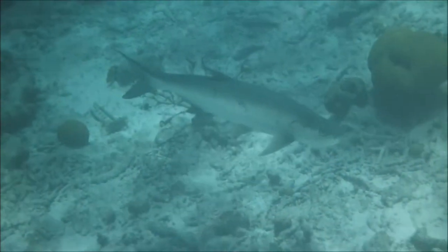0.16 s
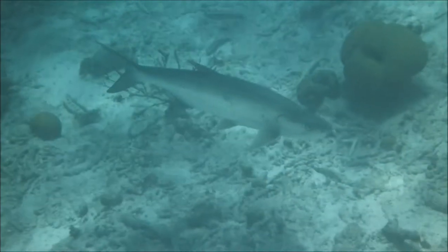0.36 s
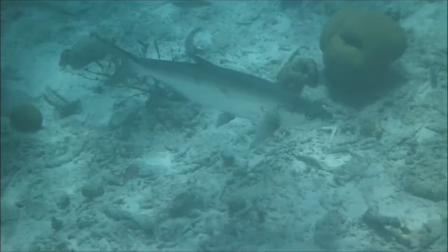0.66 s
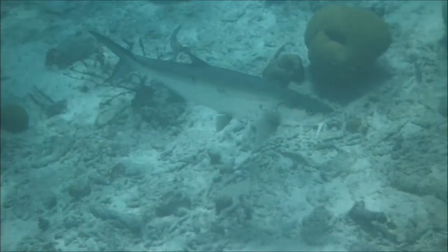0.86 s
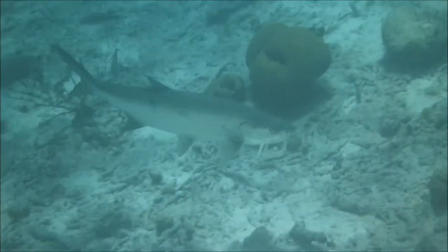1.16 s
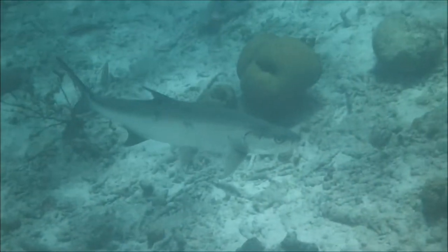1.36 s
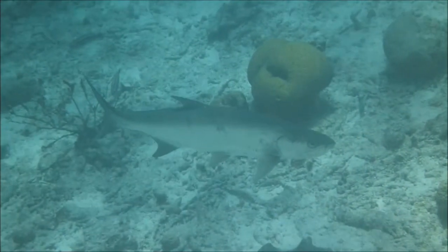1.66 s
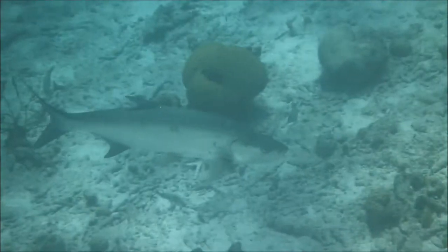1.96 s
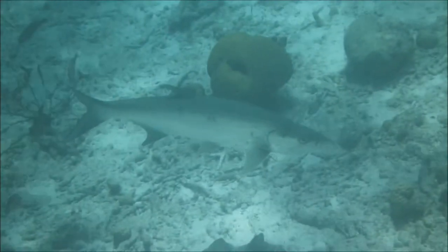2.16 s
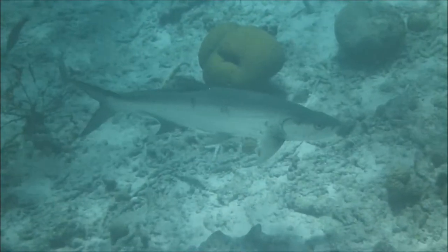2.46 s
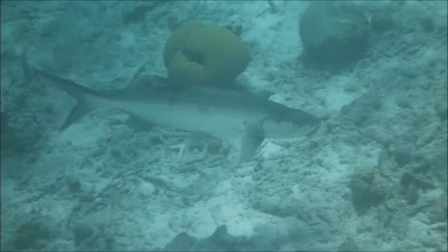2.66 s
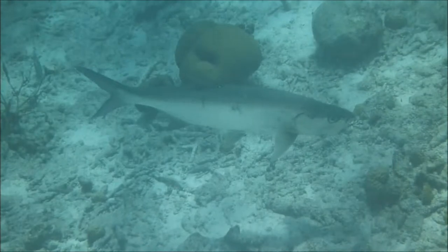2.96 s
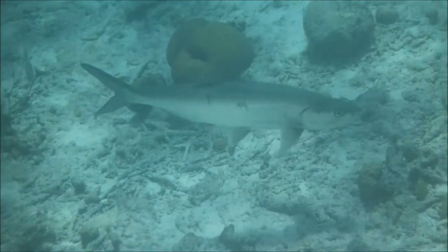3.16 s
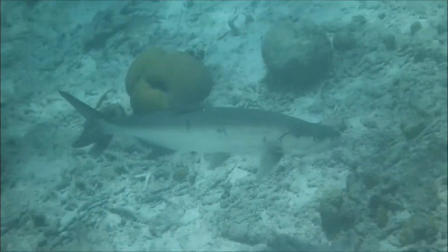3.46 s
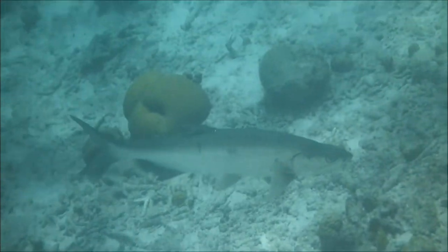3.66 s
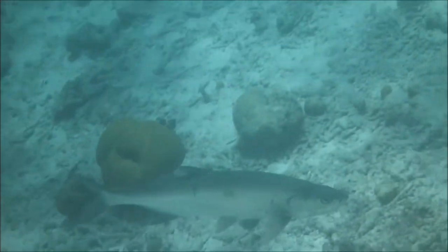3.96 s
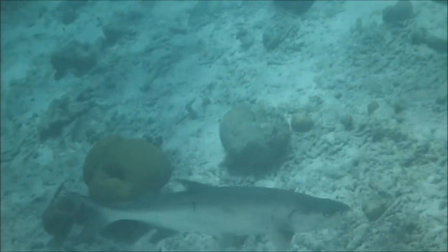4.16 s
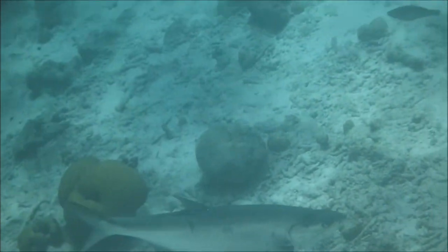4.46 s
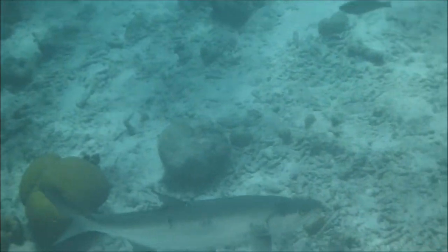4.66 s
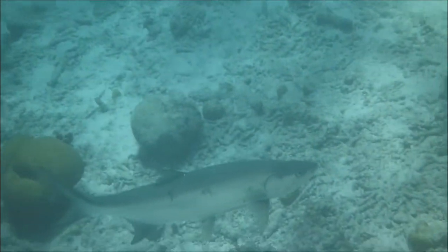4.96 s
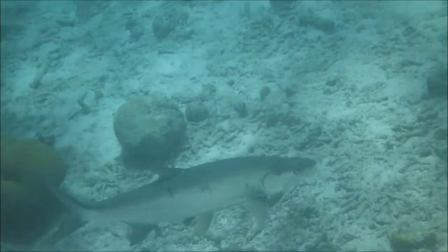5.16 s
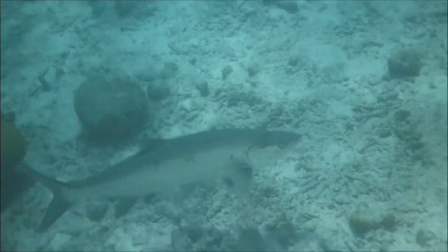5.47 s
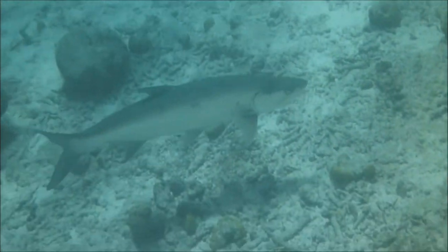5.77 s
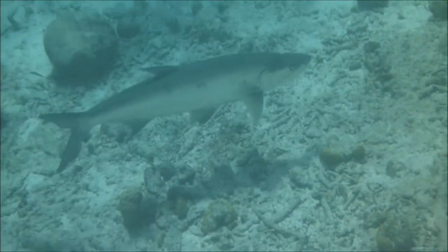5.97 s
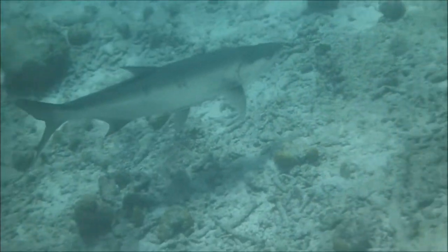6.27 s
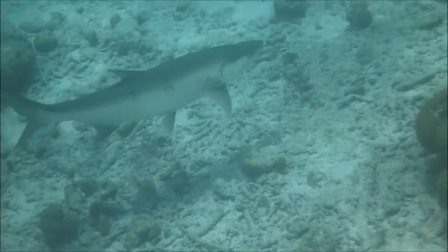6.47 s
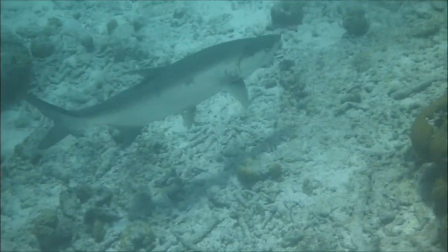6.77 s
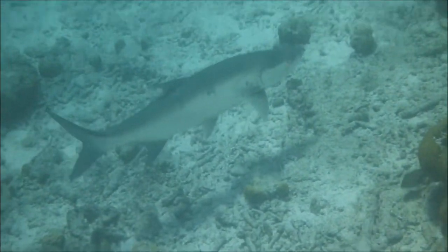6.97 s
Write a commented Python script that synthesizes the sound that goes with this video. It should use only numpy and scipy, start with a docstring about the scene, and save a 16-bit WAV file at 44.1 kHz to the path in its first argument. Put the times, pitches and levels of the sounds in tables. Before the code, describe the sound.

Snapping shrimp crackle densely over a flickering underwater hiss, with a faint motor ticking early, dull water thuds and small bubble pops.

```python
"""Snapping shrimp crackle near and far on a coral reef, heard under water from inside a sealed camera housing.
Snaps are clicks with ragged bodies, coral tails and echoes; the most distant merge into flickering noise. A
focus motor's steps ring the lens barrel in bursts, one longer run and three knocks, all in the first 3 s. Water
nudges the case with dull thuds, bubbles and small knocks pop as ringing sines, a hollow resonance wavers
beneath. The recorder cuts bass and top, notches three pitches, ducks after loud snaps and limits."""
import sys
import numpy as np
from scipy import signal
from scipy.fft import rfft, irfft
from scipy.io import wavfile
from scipy.ndimage import uniform_filter1d, minimum_filter1d

SR = 44100
rng = np.random.default_rng(int(sys.argv[2]) if len(sys.argv) > 2 else 0)


def unload_audio(sound):
    """Save the sound as a 16-bit wav file, at the path given as the first command line argument."""
    columns = np.transpose(np.atleast_2d(sound))
    # keep every value between -1 and 1, then stretch to whole-number steps
    steps = np.round(np.clip(columns, -1, 1) * 32767)
    wavfile.write(sys.argv[1], SR, steps.astype(np.int16))


N = 313551

# frequency bands in which snaps are built: low_hz, high_hz
BANDS_HZ = [(1100, 2900), (2900, 5000), (5000, 8500), (8500, 15800)]


def from_db(db):
    """Decibels to amplitude ratio."""
    return 10 ** (np.asarray(db) / 20)


def rms_one(x):
    """Scale to an RMS of 1."""
    return x / np.sqrt(np.mean(x ** 2) + 1e-20)


def in_time(rows):
    """Interpolate each column after the first (time in s) to every sample."""
    s, *columns = np.transpose(rows)
    return [np.interp(np.arange(N) / SR, s, c) for c in columns]


def drift(rate_hz):
    """Slow chance of spread 1: noise through two equal one-pole low-passes, run in."""
    step = 40   # samples between drawn values
    r = np.exp(-2 * np.pi * rate_hz * step / SR)
    noise = rng.standard_normal(N // step + 2002)
    slow = signal.lfilter([1], [1, -2 * r, r * r], noise)[2000:]
    return np.interp(np.arange(N) / step, np.arange(len(slow)), rms_one(slow))


def clicks(times_s, sizes):
    """Single-sample impulses at the given times."""
    out = np.zeros(N)
    at = np.clip((np.asarray(times_s) * SR).astype(int), 0, N - 1)
    np.add.at(out, at, sizes)
    return out


def dying(x, t60_s):
    """Every click becomes a jump that decays exponentially."""
    return signal.lfilter([1], [1, -from_db(-60 / (t60_s * SR))], x + 1e-18)


def ring(x, hz, t60_s):
    """Two-pole resonator: a unit click starts a decaying sine of height about 1."""
    r = from_db(-60 / (t60_s * SR))
    w = 2 * np.pi * hz / SR
    return signal.lfilter([0, np.sin(w)], [1, -2 * r * np.cos(w), r * r], x + 1e-18)


def shrimp(hiss_db):
    """Each snap is a click with a ragged body a few ms long; coral scatters it into a short noise tail."""
    # distant snaps, by band: tilt_db
    far_tilt_db = [-9, -4, 0, -14]
    # ragged body of a snap, by band: t60_s
    crack_t60_s = [0.0029, 0.0058, 0.007, 0.0071]
    grit_db = -14   # body re click
    scatter_db, scatter_t60_s = [-30, -25, -34, -52], 0.029   # coral tail re click, by band
    far_per_s, far_colour_db = 400, 9
    far_floor_db, far_spread_db, far_max_spreads = -1, 6, 4   # floor re hiss, before tilt and colour

    near_s, near_db = near_snaps()
    spreads = np.minimum(rng.exponential(1, N), far_max_spreads)
    far_db = hiss_db + far_floor_db + far_spread_db * spreads
    born = rng.random(N) < far_per_s * from_db(3 * drift(8)) / SR
    grit = rng.choice([-1, 1], N)
    wash = rng.standard_normal(N)
    out = 0
    for k, shape in enumerate(case_bands()):
        # the path of a far snap takes away some bands and spares others
        path_db = -far_colour_db * np.abs(rng.standard_normal(N))
        far = born * from_db(far_db + far_tilt_db[k] + path_db)
        snaps = far + clicks(near_s, from_db(near_db[:, k]))
        body = from_db(grit_db) * dying(snaps, crack_t60_s[k]) * grit
        tail = from_db(scatter_db[k]) * dying(snaps, scatter_t60_s) * wash
        out = out + signal.fftconvolve(snaps + body + tail, shape)[:N]
    return out


def near_snaps():
    """Times and band levels of near snaps, each with three echoes between sea bed and coral."""
    # near snaps: start_s, level_db, strongest_pitch_hz, fall_db_per_octave away from that pitch; the row at
    # 2.766 s is the focus motor's first knock, built like a snap
    snap_rows = [(0.0484, -10.5, 5100, 14), (0.0527, -18, 3610, 4), (0.1118, -19.0, 5800, 18),
                 (0.431, -14, 8900, 17), (0.4418, -24.5, 9000, 2), (0.51, -19.5, 5200, 11),
                 (0.684, -12.5, 6100, 9.5), (0.8434, -15.5, 3270, 18), (0.8505, -13.5, 7500, 6.5),
                 (0.969, -19, 8680, 15), (0.9913, -17.5, 6240, 6), (1.0129, -19, 5010, 16),
                 (1.0633, -16, 3150, 20), (1.0733, -16, 3100, 18), (1.102, -20.0, 4330, 19),
                 (1.2164, -15.5, 9000, 20), (1.2563, -15, 8900, 18), (1.4399, -15, 6300, 11.5),
                 (1.5103, -20, 2720, 14), (1.5358, -16, 8680, 22), (1.6447, -11, 5100, 9.5),
                 (1.7914, -15.5, 9100, 11.5), (1.8192, -8.5, 9400, 18), (1.8708, -20.0, 4970, 17),
                 (2.0186, -12.5, 8060, 8.5), (2.0265, -26.5, 5200, 5), (2.1636, -23.0, 5800, 18),
                 (2.1774, -12.0, 8600, 7.5), (2.2605, -18.5, 2880, 1.5), (2.2646, -14, 4870, 11),
                 (2.431, -14.5, 4700, 23), (2.5096, -24.5, 7800, 4), (2.766, -10.5, 3000, 20),
                 (2.8043, -17, 5800, 20), (2.8655, -13.5, 5640, 8), (2.9792, -12.0, 2650, 10.5),
                 (3.0944, -17.5, 4490, 11), (3.1106, -12.5, 7780, 18), (3.1436, -15, 9000, 15),
                 (3.156, -19.0, 9000, 5), (3.2753, -24, 6480, 21), (3.425, -10, 9400, 19),
                 (3.5383, -16, 7230, 15), (3.5805, -23, 8600, 9), (3.691, -22.0, 5230, 10),
                 (3.7012, -9.5, 5590, 5), (3.7489, -14, 3350, 17), (3.7707, -8, 4600, 3.5),
                 (3.8616, -23.0, 8700, 11), (3.958, -19, 7500, 13), (4.0034, -25, 4200, 10),
                 (4.0092, -13.5, 9000, 17), (4.0233, -27, 2240, 3), (4.0285, -11.5, 4760, 14),
                 (4.0475, -15, 4490, 18), (4.0776, -22, 8370, 8.5), (4.209, -20, 4470, 14),
                 (4.2451, -7, 6800, 14.5), (4.2788, -18.5, 7500, 18), (4.3792, -26, 3800, 8),
                 (4.4765, -4.5, 1550, 6), (4.5969, 1, 2030, 6), (4.7828, -24, 7100, 13),
                 (4.8222, -13.5, 5300, 17), (4.8683, -20, 5170, 15), (4.9446, -24, 5500, 7),
                 (5.2924, -15.0, 7200, 21), (5.7331, -11, 2850, 23), (6.089, -19, 4700, 11),
                 (6.175, -14.5, 9100, 15.5), (6.2365, -15, 7700, 11.5), (6.438, -15.5, 5250, 11),
                 (6.5048, -8.5, 1970, 6.5), (6.5087, -3.5, 3080, 30), (6.5319, -4.5, 8500, 21),
                 (6.634, -14.5, 5800, 14), (6.7561, -10, 7600, 7), (6.7771, -21, 3880, 12),
                 (6.8013, -12, 8060, 17), (6.8077, -8, 7700, 11), (6.812, -20.5, 5010, 9),
                 (6.8656, -22, 7500, 12), (6.9216, -13, 7500, 12), (7.0837, -19, 4950, 18)]
    # a sharp blow rings the high band of the case and hardly reaches the top one, by band: lift_db
    case_lift_db = [-0.5, 0.5, 4, -2]
    echo_s, echo_spread_s, echo_db, echo_colour_db = 0.0057, 0.0006, -17, 5.5   # delay, level per echo

    s, level_db, hz, fall_db = np.transpose(snap_rows)
    centre_hz = np.sqrt(np.prod(BANDS_HZ, axis=1))
    octaves = np.abs(np.log2(centre_hz / hz[:, None]))
    direct_db = level_db[:, None] - fall_db[:, None] * octaves + case_lift_db
    times_s, levels_db = [s], [direct_db]
    for n in (1, 2, 3):
        jitter_s = echo_spread_s * rng.standard_normal(len(s))
        colour_db = echo_colour_db * rng.standard_normal(direct_db.shape)
        times_s.append(s + n * echo_s + jitter_s)
        levels_db.append(direct_db + n * echo_db + colour_db)
    return np.concatenate(times_s), np.concatenate(levels_db)


def case_bands():
    """Impulse response of the case within each band, peak 1."""
    case = housing_response()[:512]
    shapes = []
    for band_hz in BANDS_HZ:
        band = signal.butter(3, band_hz, "band", fs=SR, output="sos")
        shape = signal.sosfilt(band, case)
        shapes.append(shape / np.abs(shape).max())
    return shapes


def housing_response(size=8192):
    """Minimum-phase impulse response of case and microphone, by folding the cepstrum."""
    # colour of case and microphone: pitch_hz, level_db
    colour = [(130, -22.5), (400, -2.5), (900, -2), (2140, -1.5), (2460, 1), (3000, -6), (3850, -0.5),
              (4400, -5), (6570, 1), (8100, -7.5), (9500, -17.5), (10700, -13), (14300, -24),
              (15800, -20.5)]
    hz, db = np.transpose(colour)
    grid_hz = np.maximum(np.arange(size // 2 + 1) * SR / size, 10)
    cepstrum = irfft(np.log(from_db(np.interp(np.log(grid_hz), np.log(hz), db))))
    cepstrum[1:size // 2] *= 2
    cepstrum[size // 2 + 1:] = 0
    return irfft(np.exp(rfft(cepstrum)))[:size // 2]


def motor():
    """Steps at a steady rate strike the lens barrel's modes, in bursts, then one longer run; silent between."""
    # motor level, interpolated: time_s, level_db
    level_rows = [(0, -43.5), (2.1, -42.5), (2.25, -54), (2.55, -46)]
    # lens barrel modes: pitch_hz, level_db, t60_s (steps only)
    modes = [(954, -10, .05), (1300, -6, .015), (2860, -8, .05), (2980, -6, .035), (3100, 0, .05)]
    # the last two of the motor's three knocks as the lens settles (the first is built like a near snap):
    # start_s, level_db
    knock_rows = [(2.8148, -25), (2.8815, -31)]
    step_hz, burst_hz, step_jitter_s = 119.2, 14.985, 4e-5
    burst_start_s, burst_s = 0.038, 0.036
    run_start_s, run_end_s = 2.505, 2.72

    t = np.arange(N) / SR
    bursts = ((t - burst_start_s) % (1 / burst_hz) < burst_s) & (t < run_start_s)
    run = (t > run_start_s) & (t < run_end_s)
    moving = uniform_filter1d(1. * (bursts | run), size=120)

    starts_s = np.arange(burst_start_s, run_start_s - burst_s, 1 / burst_hz)
    burst_steps_s = (starts_s[:, None] + np.arange(0, burst_s, 1 / step_hz)).ravel()
    steps_s = np.append(burst_steps_s, np.arange(run_start_s, run_end_s, 1 / step_hz))
    steps_s += step_jitter_s * rng.standard_normal(len(steps_s))
    knock_s, knock_db = np.transpose(knock_rows)
    rings, knocks = 0, 0
    for k, (hz, db, t60_s) in enumerate(modes):
        chance_db = rng.normal(0, 2, len(steps_s))
        rings = rings + ring(clicks(steps_s, from_db(db + chance_db)), hz, t60_s)
        if k > 0:   # knocks leave out the lowest mode
            knocks = knocks + ring(clicks(knock_s, from_db(knock_db + db)), hz, 0.031)
    return from_db(in_time(level_rows)[0]) * moving * rings + knocks


def water():
    """Thuds are dull pushes plus low noise under soft swells; the noise also sloshes at random; bubbles and
    small knocks ring."""
    # clear knocks of water on the case: time_s (push starts thud_delay_s later), level_db
    thud_rows = [(0.616, -39.5), (1.313, -46), (1.436, -41), (1.493, -50), (1.575, -52), (1.669, -45),
                 (1.778, -53), (2.135, -46), (2.248, -48), (2.429, -45), (2.479, -44), (2.644, -49),
                 (3.099, -51), (3.212, -47), (4.127, -41), (4.381, -49), (4.527, -34), (4.846, -50),
                 (4.998, -44), (5.498, -39.5), (5.59, -46), (5.845, -39.5), (5.946, -46), (6.071, -49),
                 (6.206, -54), (6.916, -51)]
    # short pitched pops: small bubbles, and ringing knocks at 2.572, 3.224, 5.798 and 6.748 s: start_s,
    # level_db, pitch_hz
    ping_rows = [(1.538, -31.5, 1000), (2.572, -19.5, 2640), (2.729, -30, 1230), (3.055, -32, 640),
                 (3.117, -32.5, 693), (3.224, -21, 3440), (3.475, -42, 550), (4.727, -32, 1100),
                 (4.761, -30.5, 1050), (5.648, -29, 1000), (5.798, -24, 1890), (6.748, -33, 2000),
                 (6.89, -32, 990)]
    thud_delay_s, swell_peak_s, swell_db = 0.00748, 0.012, -12.5
    slosh_db, slosh_spread_db = -76.5, 5

    dull = signal.butter(3, [55, 210], "band", fs=SR, output="sos")
    low = rms_one(signal.sosfilt(dull, rng.standard_normal(N)))
    push = signal.sosfilt(dull, signal.unit_impulse(4000))
    t = np.arange(4000) / SR / swell_peak_s
    s, db = np.transpose(thud_rows)
    thuds = clicks(s + thud_delay_s, from_db(db))
    swells = from_db(swell_db) * signal.fftconvolve(thuds, t * np.exp(1 - t))[:N]
    slosh = from_db(slosh_db + slosh_spread_db * np.minimum(drift(13), 2))
    out = signal.fftconvolve(thuds, push / np.abs(push).max())[:N]
    out += low * (swells + slosh)
    for s, db, hz in ping_rows:
        out += ring(clicks([s], from_db(db)), hz, 22 / hz)   # falls 60 dB in 22 cycles
    return out


def hiss(hiss_db):
    """Countless distant snaps merge into noise, coloured by the case, that flickers in half-octave bands."""
    together_db, apart_db = 1.62, 2.85   # flicker spread: shared above 900 Hz, and per band
    edges_hz = 25 * 2 ** np.arange(0, 9.6, .5)
    edges_hz[-1] = 17000
    together = drift(43)
    # two noises alternate, so neighbouring bands are independent
    white = rng.standard_normal((2, N))
    coloured = signal.fftconvolve(white, housing_response()[None])[:, :N]
    out = 0
    for k, (low_hz, high_hz) in enumerate(zip(edges_hz, edges_hz[1:])):
        band = signal.butter(2, [low_hz, high_hz], "band", fs=SR, output="sos")
        part = signal.sosfilt(band, coloured[k % 2])
        out = out + part * from_db(together_db * together * (low_hz > 900) + apart_db * drift(42))
    return from_db(hiss_db) * rms_one(out)


def hum():
    """A hollow wavering resonance, likely the air inside the case: noise through one resonator."""
    pitch_hz, t60_s, level_db, waver_db = 796.5, 3.0 / 133, -52, 4.17
    tone = ring(rng.standard_normal(N), pitch_hz, t60_s)
    return from_db(level_db + waver_db * drift(16.3)) * rms_one(tone)


def scene():
    """Sum of all sources; the hiss level also sets the level of the far snaps."""
    # the reef, interpolated: time_s, hiss_db
    reef_rows = [(0.0, -41), (0.32, -42.5), (1.09, -40), (4.85, -45), (7.11, -41.5)]
    hiss_db, = in_time(reef_rows)
    return (shrimp(hiss_db) + motor() + water() + hiss(hiss_db) + hum())[None]


def record(dry):
    """Bass cut, notches, gain control that ducks just after a loud snap and recovers, limiter, steep top cut."""
    # notches: pitch_hz, width_hz, depth_db
    notch_rows = [(2896, 130, -30), (7849, 60, -20), (11690, 2200, -17)]
    bass_cut_hz, top_cut_hz, limit = 107, 16000, 0.93
    duck_from_db, duck_share, duck_back_db_per_s, duck_attack_s = -13.5, 0.17, 32, 0.066

    dry = signal.sosfilt(signal.butter(2, bass_cut_hz, "high", fs=SR, output="sos"), dry)
    for hz, width_hz, depth_db in notch_rows:
        cut = signal.lfilter(*signal.iirnotch(hz, hz / width_hz, SR), dry)
        dry = cut + from_db(depth_db) * (dry - cut)

    level_db = 20 * np.log10(np.abs(dry) + 1e-9)
    duck_db = np.maximum(level_db - duck_from_db, 0) * duck_share
    # peak hold that falls back at a constant dB rate
    ramp_db = duck_back_db_per_s * np.arange(N) / SR
    held_db = np.maximum.accumulate(duck_db + ramp_db, axis=1) - ramp_db
    r = np.exp(-1 / (duck_attack_s * SR))
    ducked = dry * from_db(-signal.lfilter([1 - r], [1, -r], held_db))

    # look-ahead limiter: gain eases down over about 2 ms around any overload
    room = minimum_filter1d(limit / np.maximum(np.abs(ducked), limit), size=161)
    limited = ducked * uniform_filter1d(room, size=81)
    return signal.sosfilt(signal.cheby2(24, 45, top_cut_hz, fs=SR, output="sos"), limited)


dry = scene()
out = record(dry)
unload_audio(out)
```